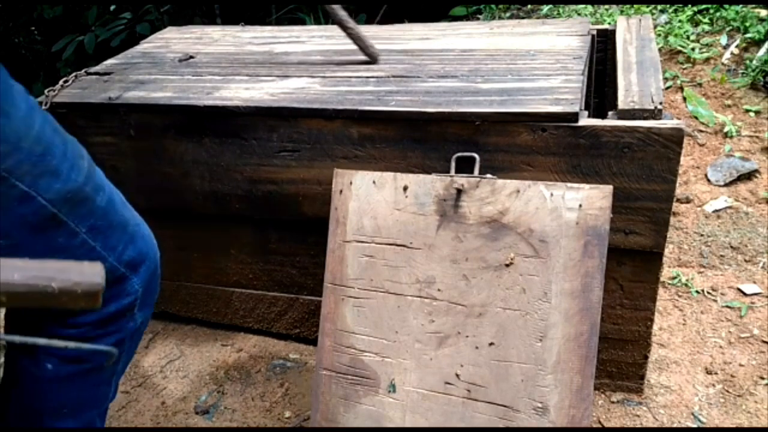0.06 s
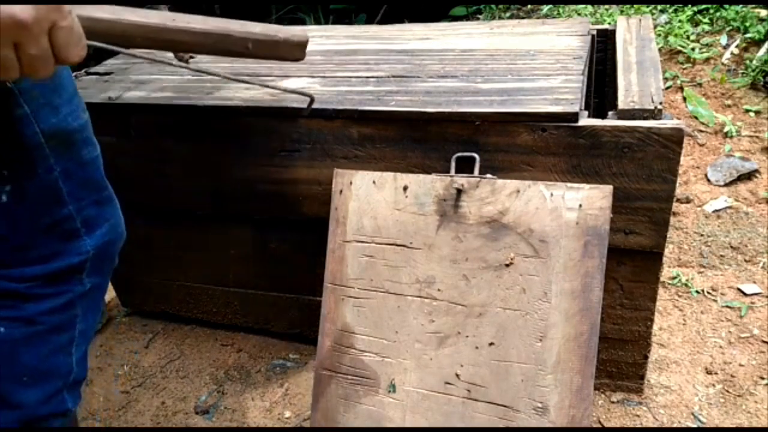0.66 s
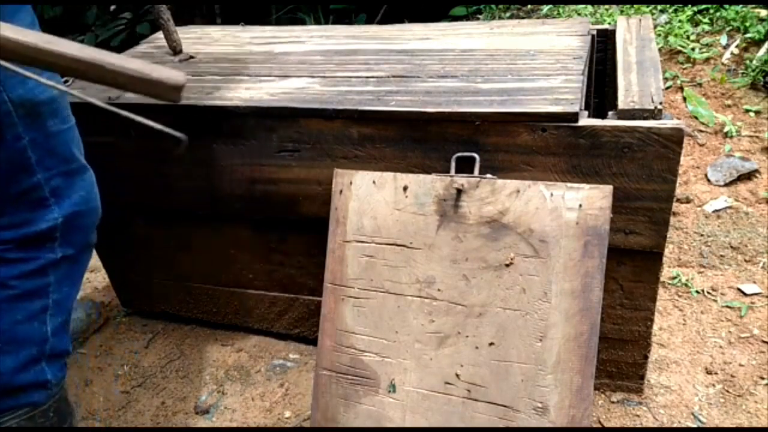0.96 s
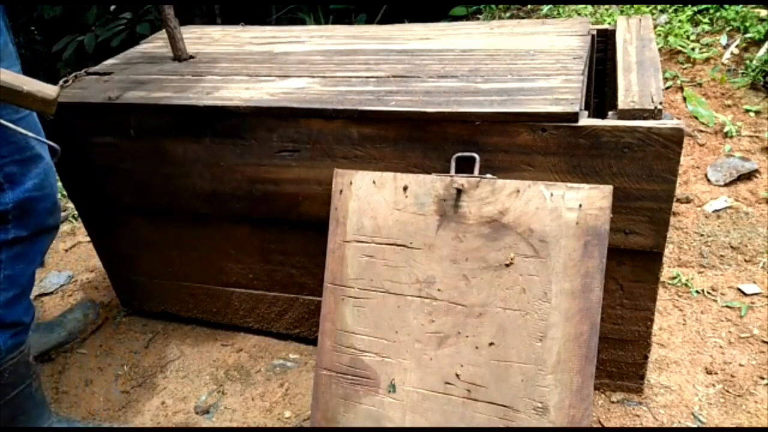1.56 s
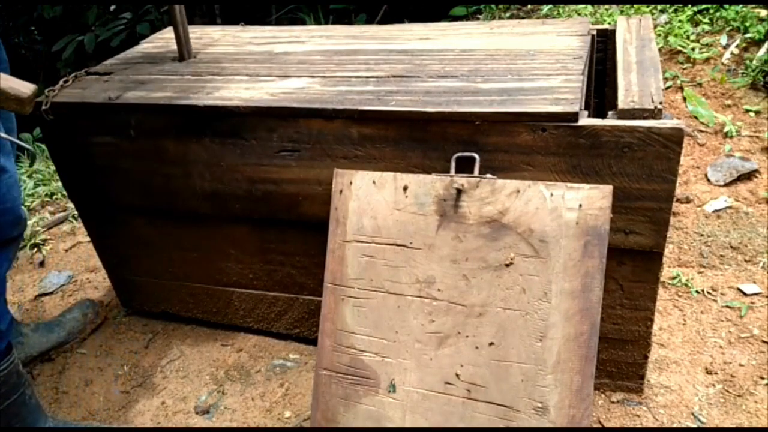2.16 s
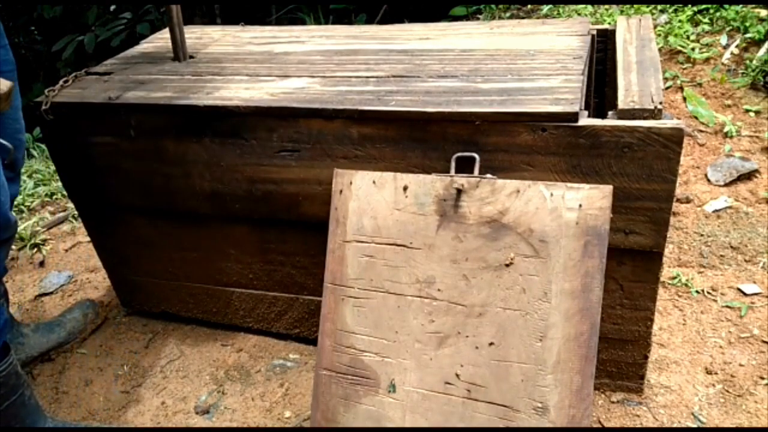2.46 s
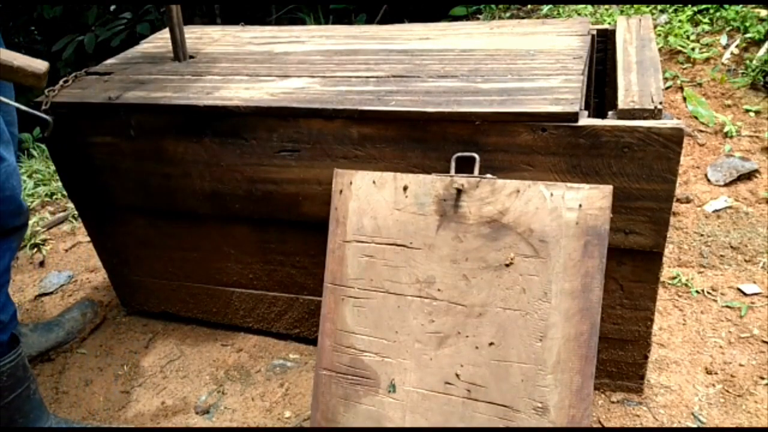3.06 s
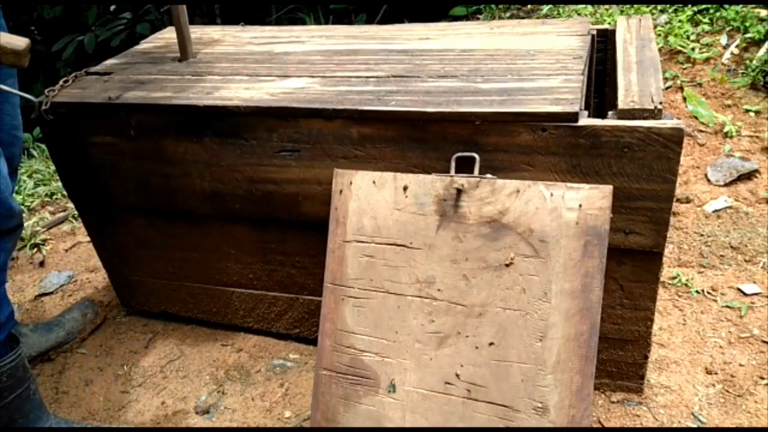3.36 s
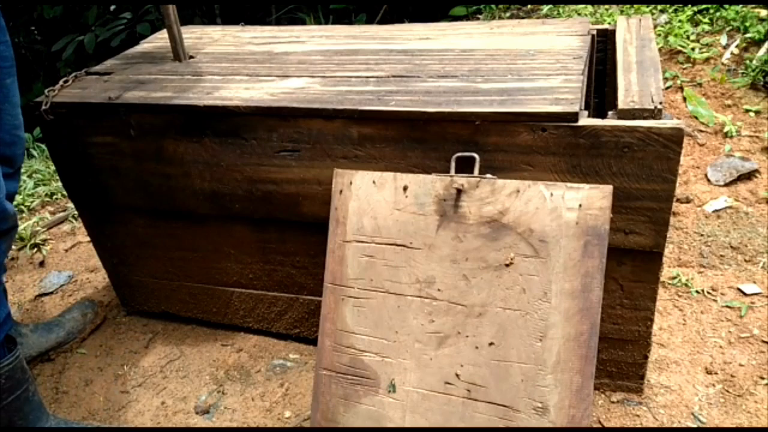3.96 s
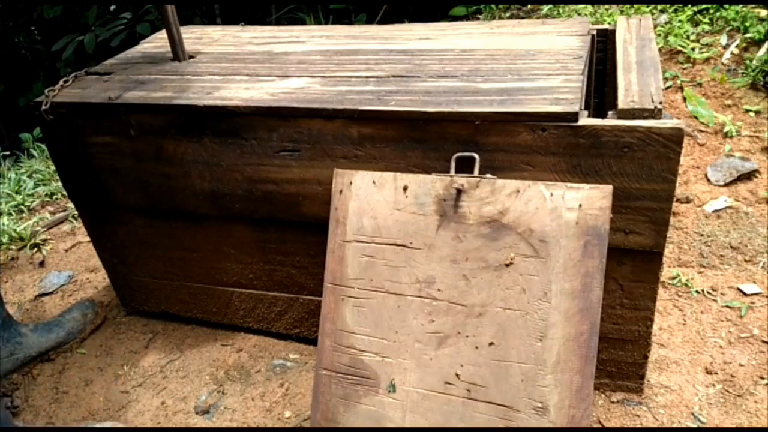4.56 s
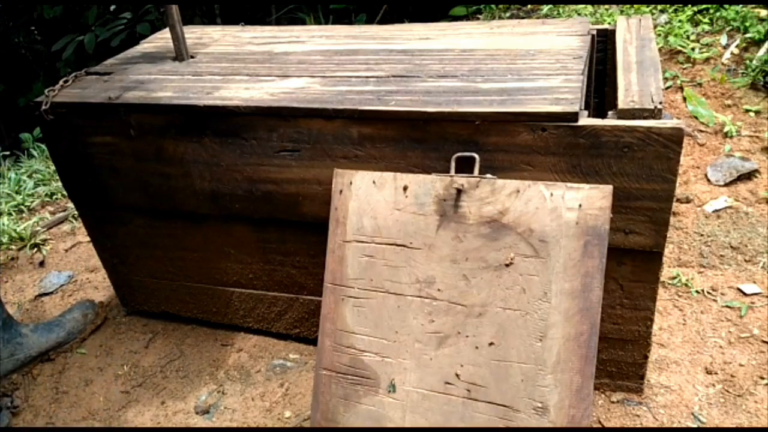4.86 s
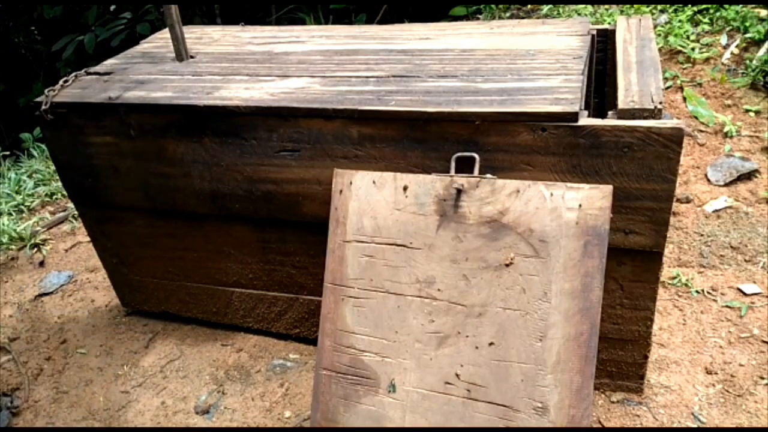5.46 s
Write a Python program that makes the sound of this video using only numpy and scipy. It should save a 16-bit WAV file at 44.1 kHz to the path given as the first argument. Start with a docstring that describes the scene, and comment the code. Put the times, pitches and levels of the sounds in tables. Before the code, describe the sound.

A stick knocks on a hollow wooden box trap, close to the microphone, in a quiet wood. A firm knock and a lighter bump open the sound. Soft, dull thumps follow unevenly from 0.5 to 1.2 seconds, with a fuller one at 1.5. At 2.3 seconds a loud, sharp crack rings the whole box, with a dull rebound right after. A lull with tiny taps follows, and light bumps return around 3.7 seconds. Two loud, hard knocks land at 4.0 and 4.5 seconds, then a softer thump at 4.9. The hard hits die quickly, leaving a slight echo from the trees and a trace of falling grit. Very faint forest air and stirring leaves run throughout, with barely audible clothing rustle, a few boot scuffs in the first two seconds, and thin, very high, distant chirps near 2.7 and 4.8 seconds.

```python
"""At the edge of a wood, a plank box trap stands on bare earth while its trigger stick is fitted.
The stick bumps softly on the lid; a few hard knocks ring the whole hollow box, crack on contact,
shake grit loose and echo faintly off the trees. Clothes brush and boots scuff beside it.
Behind lies a bed of forest air and stirring leaves, with two thin, very high chirps."""
import sys
import numpy as np
from scipy import signal
from scipy.io import wavfile
from scipy.ndimage import uniform_filter1d, minimum_filter1d

SR = 44100
rng = np.random.default_rng(int(sys.argv[2]) if len(sys.argv) > 2 else 0)


def pcm_store(signal):
    """Save signal as 16-bit PCM."""
    levels = np.round(np.clip(np.atleast_2d(signal), -1, 1) * 32767)
    wavfile.write(sys.argv[1], SR, levels.astype(np.int16).T)


N = 242582
TIME = np.arange(N) / SR

# blows on the box: (time [s], strength [dB], contact corner [Hz], place struck)
BLOWS = [(0.06, -7, 580, "lid"), (0.157, -20, 320, "lid"), (0.228, -36.5, 168, "lid end"),
         (0.5356, -20, 148, "lid end"), (0.6438, -22.5, 105, "lid end"), (0.8388, -15, 128, "lid end"),
         (1.146, -13, 126, "lid end"), (1.5084, -4, 172, "lid end"), (1.7836, -23.5, 186, "rim"),
         (1.9594, -35, 318, "rim"), (2.0192, -31.5, 238, "rim"), (2.1128, -37.5, 340, "rim"),
         (2.3055, 5, 2320, "stick hole"), (2.355, -3.5, 165, "stick hole"), (2.437, -35, 169, "rim"),
         (2.474, -33, 153.5, "stick hole"), (2.608, -34, 123, "rim"), (3.08, -42.5, 121, "stick hole"),
         (3.4365, -33.5, 198.6, "frame"), (3.5936, -35, 242, "rim"), (3.7227, -24, 124, "rim"),
         (3.898, -21.5, 228, "lid end"), (3.9485, -24, 326, "rim"), (4.0452, 6.5, 431, "frame"),
         (4.5458, 8.5, 395, "frame"), (4.9206, -2.5, 200, "frame")]
# fine, bright rustle of leaves and cloth: (frequency [Hz], relative density [dB])
RUSTLE_SPECTRUM = [(3000, -11), (5500, 6), (8000, 8.5), (12000, -3.5), (15500, -15)]


def from_db(db):
    """Decibels to gain."""
    return 10 ** (np.asarray(db) / 20)


def at_hz(points, hz):
    """Read a table on a log-frequency axis."""
    known_hz, values = np.transpose(points)
    return np.interp(np.log(hz), np.log(known_hz), values)


def dying(t, t60):
    """Free decay, 60 dB down after t60 seconds."""
    return from_db(-60 * t / t60)


def stereo_noise(spectrum, likeness, size=N, t60s=None):
    """Noise in half-octave bands, each dying at its own rate if t60s is given; rms 1."""
    edges = 30 * 2 ** np.arange(0, 9.6, .5)
    white = rng.standard_normal((2, 2, size))
    out = 0
    for k, (low, high) in enumerate(zip(edges, edges[1:])):
        band = signal.sosfilt(signal.butter(2, [low, high], "band", fs=SR, output="sos"), white[k % 2])
        hz = np.sqrt(low * high)
        fade = dying(TIME[:size], at_hz(t60s, hz)) if t60s else 1
        out = out + band * fade * from_db(at_hz(spectrum, hz))
    correlation = np.clip(likeness, -.99, .99)   # near 1 is centred, 0 is wide
    mid, side = np.sqrt(1 + correlation) * out[0], np.sqrt(1 - correlation) * out[1]
    pair = np.array([mid + side, mid - side])
    return pair / np.sqrt(np.mean(pair ** 2))


def contact(x, corner_hz, order):
    """Low-pass: a soft contact lasts longer and leaves the high modes unmoved."""
    return signal.sosfilt(signal.butter(order, min(corner_hz, SR / 3), fs=SR, output="sos"), x)


def add(out, sound, start_s):
    """Mix a short sound in at its time."""
    start = max(round(start_s * SR), 0)
    out[:, start:start + sound.shape[-1]] += sound[..., :N - start]


def swell(peak_s, length_s):
    """A movement gathers speed and slows again; height 1."""
    return np.cos(np.pi * np.clip((TIME - peak_s) / length_s, -.5, .5)) ** 2


def flutter(depth_db=0.23, step_s=0.08):
    """The quick, random unevenness of air and leaves, in dB."""
    steps = rng.standard_normal(size=1000)
    return depth_db * np.interp(TIME / step_s, np.arange(len(steps)), steps)


def forest_bed(air_db, leaves_db, rustle_db):
    """Low forest air, stirring leaves and a fine rustle, all rising and falling together."""
    # colours of the air and the leaves: (frequency [Hz], relative density [dB])
    air_spectrum = [(18, -66), (30, -35.5), (55, -10), (75, -5.5), (130, -4), (148, -16), (225, -6),
                    (263, -13.5), (389, -11.5), (591, -14.5), (709, -13.5), (1470, -23.5), (2070, -20.5),
                    (8720, -43.5), (15500, -54)]
    leaf_spectrum = [(1000, -17.5), (1600, -0.5), (2300, 0), (3000, -0.5), (4000, -20), (6000, -24.5)]
    # how much the leaves stir: (time [s], relative level [dB])
    stirring = [(0.0, -68), (0.15, -70), (2.25, -68.5), (2.62, -71), (4.64, -70.5), (5.5, -71)]
    stir_db = np.interp(TIME, *np.transpose(stirring))
    stir_db -= stir_db.mean()
    settling_db = 0.54 * TIME   # the fine rustle slowly sinks away
    air = from_db(air_db + stir_db + flutter()) * stereo_noise(air_spectrum, likeness=0.32)
    leaves = from_db(leaves_db + 1.1 * stir_db + flutter()) * stereo_noise(leaf_spectrum, likeness=-.2)
    rustle = from_db(rustle_db + 0.9 * stir_db - settling_db) * stereo_noise(RUSTLE_SPECTRUM, likeness=.05)
    return air + leaves + rustle


def breeze():
    """Puffs of breeze make the leaves hiss a little louder."""
    # smooth puffs: (peak time [s], length [s], level [dB])
    puffs = [(0.75, 0.4, -72), (1.48, 0.28, -68.5), (1.998, .55, -69)]
    # hiss of blown leaves: (frequency [Hz], relative density [dB])
    puff_spectrum = [(1500, -15), (2400, 0.5), (3000, 1), (3800, -19.5), (6000, -31)]
    blowing = sum(from_db(level_db) * swell(peak_s, length_s) for peak_s, length_s, level_db in puffs)
    return blowing * from_db(flutter()) * stereo_noise(puff_spectrum, likeness=-.2)


def chirps(waver_hz):
    """Thin, far whistles that glide with an unsteady pitch."""
    # the calls: (time [s], length [s], start pitch [Hz], end pitch [Hz], level [dB])
    calls = [(2.678, .095, 9050, 8000, -73), (4.79, 0.11, 9200, 10300, -87)]
    out = np.zeros((2, N))
    for start_s, length_s, start_hz, end_hz, level_db in calls:
        size = round(length_s * SR)
        waver = uniform_filter1d(rng.standard_normal(SR), size=60)[:size]
        hz = np.linspace(start_hz, end_hz, size) + waver_hz * waver / waver.std()
        whistle = np.sin(2 * np.pi * np.cumsum(hz) / SR)
        add(out, from_db(level_db) * np.hanning(size) * whistle, start_s)
    return out


def trapper(scuff_s):
    """Clothes brush and boots scuff the bare earth as the trapper shifts about."""
    # cloth moves: (peak time [s], length [s], level [dB])
    brushes = [(0.252, 0.75, -76.5), (1.44, 0.38, -74.5), (2.743, 0.29, -77), (3.13, 0.32, -77.5),
               (4.85, 0.24, -76.5), (5.395, 0.29, -74.5)]
    # boot moves: (peak time [s], level [dB])
    scuffs = [(0.38, -61), (1.23, -57.5), (1.706, -57.5), (1.87, -60.5)]
    # dull scrape of sole on earth: (frequency [Hz], relative density [dB])
    scuff_spectrum = [(100, -26), (250, -7), (400, 17), (800, -20), (1500, -16), (5000, -33)]
    brushing = sum(from_db(level_db) * swell(peak_s, length_s) for peak_s, length_s, level_db in brushes)
    scuffing = sum(from_db(level_db) * swell(peak_s, scuff_s) for peak_s, level_db in scuffs)
    cloth = brushing * stereo_noise(RUSTLE_SPECTRUM, likeness=0.042)
    boots = scuffing * stereo_noise(scuff_spectrum, likeness=1.0)
    return cloth + boots


def tree_echo(x, wet_db, build_s):
    """Trunks and leaves scatter back a weak, diffuse tail."""
    # colour of the tail: (frequency [Hz], relative level [dB])
    tail_spectrum = [(60, -8.5), (130, -6.5), (380, -9.5), (700, -5), (1500, -2.5), (3000, -4), (8000, 1.5)]
    # its decay: (frequency [Hz], t60 [s])
    tail_t60s = [(60, 0.51), (300, 0.52), (1000, 0.33), (4000, .7)]
    scatter = stereo_noise(tail_spectrum, likeness=1.0, size=SR, t60s=tail_t60s) / np.sqrt(SR)
    scatter *= 1 - np.exp(-(TIME[:SR] / build_s) ** 2)
    return from_db(wet_db) * signal.fftconvolve(x, scatter, axes=1)[:, :N]


def grit(level_db, t60_s, db_per_db):
    """A faint hiss of grit dies away after each blow; only the hard ones shake much loose."""
    # colour of the grit: (frequency [Hz], relative density [dB])
    grit_spectrum = [(600, -11.5), (1500, 0), (2900, 0), (4000, -17), (8000, -17.5), (15000, -30)]
    shaken = np.zeros(N)
    for start_s, strength_db, *_ in BLOWS:
        tail = (TIME > start_s) * dying(np.abs(TIME - start_s), t60_s)
        shaken += from_db(db_per_db * strength_db) * tail
    return from_db(level_db) * shaken * stereo_noise(grit_spectrum, likeness=.05)


def cracks(gain_db, rise_s, t60_s, balance_db):
    """Wood meets wood with a very short crack, which only the hardest contacts let through."""
    # colour of the crack: (frequency [Hz], relative density [dB])
    crack_spectrum = [(500, -8), (900, -2.5), (1200, 5), (1650, -6), (1900, -6), (2700, -11), (3700, -18.5),
                      (4700, -14.5), (8000, -22), (14000, -15)]
    out, t = np.zeros((2, N)), TIME[:SR // 8]
    envelope = (1 - np.exp(-(t / rise_s) ** 2)) * dying(t, t60_s)
    for start_s, strength_db, corner_hz, _ in BLOWS:
        burst = envelope * stereo_noise(crack_spectrum, likeness=.9, size=len(t))
        add(out, from_db(strength_db + gain_db) * contact(burst, corner_hz, order=3), start_s)
    return out * from_db([[balance_db / 2], [-balance_db / 2]])


def box(clack_db, clack_reach, rattle_above_db, low_cut_hz):
    """Each blow rings the box's modes, in a mix set by where it lands, under a dry clack of planks."""
    # names of the places struck, in the order of the mode columns
    places = ["lid", "lid end", "rim", "stick hole", "frame"]
    # hollow body: (frequency [Hz], t60 [s], left over right [dB], level for each place struck [dB] ...)
    box_modes = [(62.4, 0.23, 0.25, -25.5, -44.5, -36.5, -26.5, -19.5),
                 (96.6, 0.057, 0.15, -10, -28.5, -21.5, -3, -9),
                 (107.5, 0.19, -0.44, -7, -7, -9.5, -11.5, -19),
                 (124, 0.21, -1, -46, -33, -35, -13.5, -20.5),
                 (173.4, 0.15, 0, -42.5, -9, -2.5, -10, -19.5),
                 (189.4, 0.032, -0.85, -11.5, 2.5, 10, -5.5, -15.5),
                 (218.4, 0.071, -0.6, -17.5, -3.5, 0.5, -5, -10.5),
                 (257, 0.069, 0.8, -15, -6, -5.5, -12, -29.5), (346.3, 0.1, 0.5, -14.5, -31, -17, -14, -54),
                 (381, 0.13, 0.1, -16, -14, -13, -20.5, -18.5),
                 (436.6, 0.096, 0, -47, -12.5, -22.5, -15, -19.5),
                 (486, 0.028, 0.3, -17.5, -1, -14.5, -16.5, -12),
                 (608.6, 0.098, -0.5, -18, -5.5, -18.5, -25.5, -20.5),
                 (724, 0.089, -1, -13.5, -9.5, -17, -32, -37),
                 (825, 0.066, -2, -21, -31.5, -27.5, -29.5, -26.5),
                 (998, 0.07, -2.5, -13.5, -35.5, -34, -28, -20.5),
                 (1148, 0.039, -7, -15, -43, -36.5, -21.5, -33),
                 (1384, 0.062, -0.5, -13.5, -35, -40, -30, -18),
                 (1573, 0.063, 2.5, -19, -23, -33, -36.5, -9),
                 (1914, 0.063, -0.5, -14, -33.5, -36, -37, -9.5),
                 (2637, 0.023, -7.5, -37, -37, -31, -25.5, -5),
                 (3024, .05, -2.5, -25, -27.5, -35, -49.5, 3.5)]
    # the planks' crowded upper modes: (frequency [Hz], relative density [dB])
    clack_spectrum = [(300, 5), (500, -0.5), (900, -1.5), (1300, -9), (1900, -3.5), (2700, -5),
                      (3300, -8.5), (4200, -15.5), (6000, -28), (12000, -32.5)]
    # their decay: (frequency [Hz], t60 [s])
    clack_t60s = [(300, 0.22), (1000, .11), (2500, 0.078), (8000, 0.056)]
    out, t = np.zeros((2, N)), TIME[:SR // 2]
    modes = np.array(box_modes)
    hz, t60, balance_db, shapes_db = modes[:, :1], modes[:, 1:2], modes[:, 2], modes[:, 3:]
    signs = (-1) ** np.arange(len(modes))   # neighbouring modes push the air in opposite senses
    radiation = signs * from_db([balance_db / 2, -balance_db / 2])
    rings = np.sin(2 * np.pi * hz * t) * dying(t, t60)
    for start_s, strength_db, corner_hz, place in BLOWS:
        shares = from_db(shapes_db[:, places.index(place)])
        thump = contact((radiation * shares) @ rings, corner_hz, order=3)
        planks = stereo_noise(clack_spectrum, likeness=0.8, size=len(t), t60s=clack_t60s)
        clack = contact(planks, clack_reach * corner_hz, order=2)   # rough wood sharpens the attack
        # hard blows rattle the loose planks, so the clack grows faster than the thump
        rattle_db = 2 * max(strength_db - rattle_above_db, 0)
        add(out, from_db(strength_db) * (thump + from_db(clack_db + rattle_db) * clack), start_s)
    # a steep cut removes the deep rumble below about 50 Hz
    return signal.sosfilt(signal.butter(4, low_cut_hz, "high", fs=SR, output="sos"), out)


def scene():
    """The box up close, the trapper beside it and the quiet wood behind."""
    body = box(clack_db=-48.5, clack_reach=2.33, rattle_above_db=4.5, low_cut_hz=50)
    left, right = body + cracks(gain_db=-30, rise_s=.002, t60_s=0.033, balance_db=-5)
    left_lag_s = 0.00012   # the box reaches the left microphone later
    knocks = np.array([np.interp(TIME - left_lag_s, TIME, left), right])
    echo = tree_echo(knocks, wet_db=-11, build_s=.022)
    forest = forest_bed(air_db=-60, leaves_db=-70.5, rustle_db=-78.0) + chirps(waver_hz=110)
    loose_grit = grit(level_db=-71, t60_s=0.6, db_per_db=1.6)
    return knocks + echo + loose_grit + trapper(scuff_s=0.074) + forest + breeze()


def record(dry):
    """A limiter ducks any peak over full scale, and a steep low-pass cuts the very top."""
    needed_gain = 1 / np.maximum(np.abs(dry).max(axis=0), 1)
    held_gain = minimum_filter1d(needed_gain, size=201)
    gain = uniform_filter1d(uniform_filter1d(held_gain, size=101), size=101)
    cutoff_hz = 15800
    return signal.sosfilt(signal.ellip(10, .1, 80, cutoff_hz, fs=SR, output="sos"), gain * dry)


dry = scene()
out = record(dry)
pcm_store(out)
```